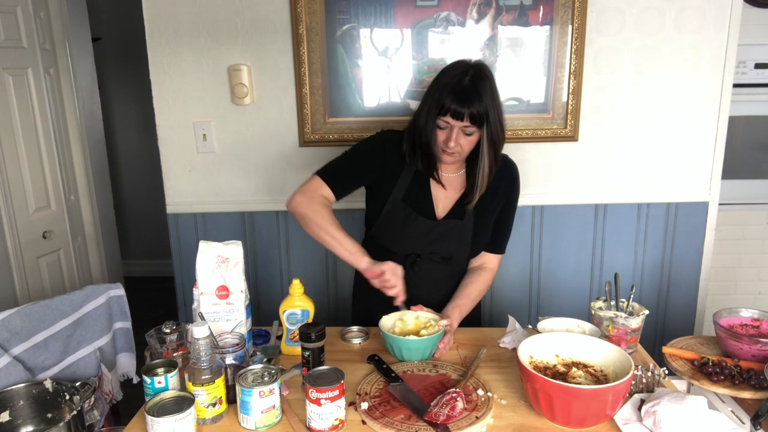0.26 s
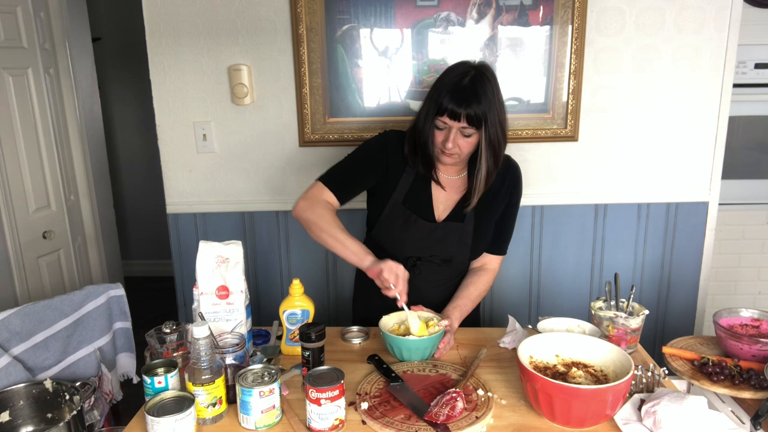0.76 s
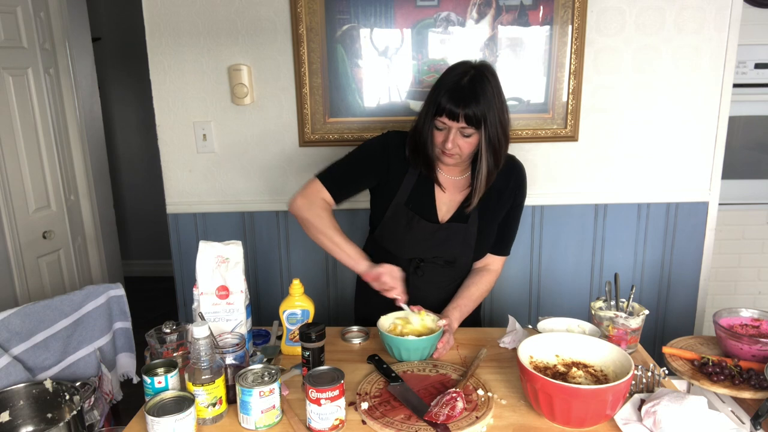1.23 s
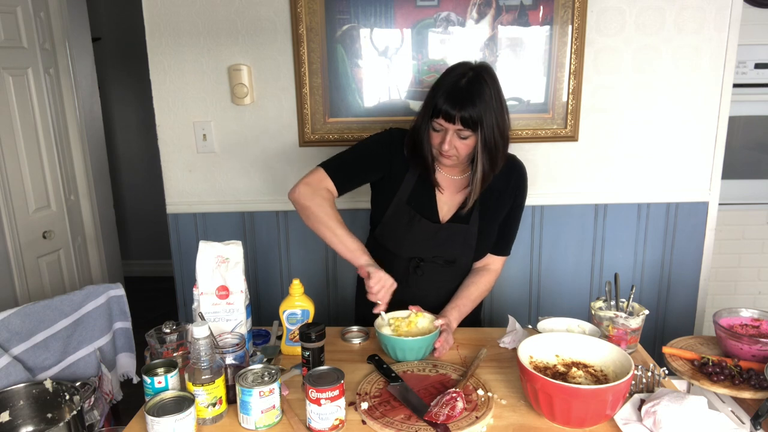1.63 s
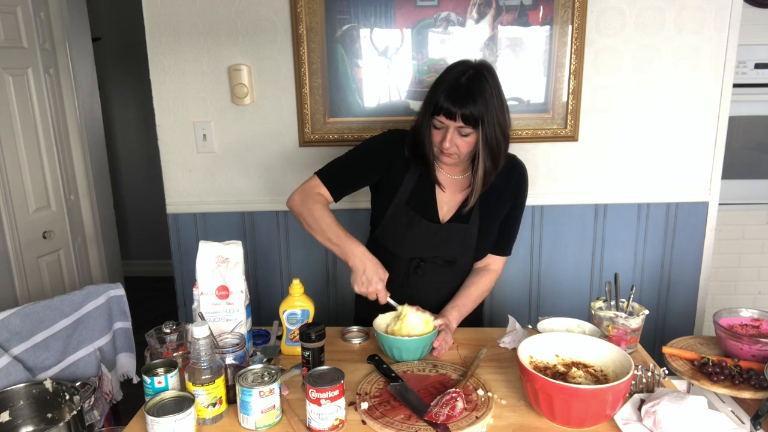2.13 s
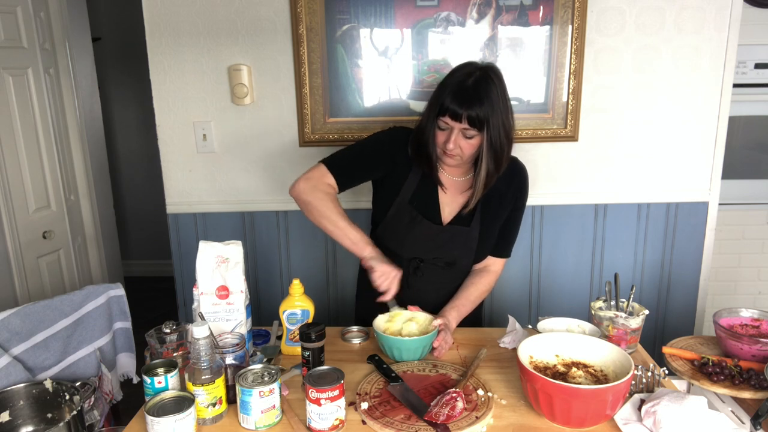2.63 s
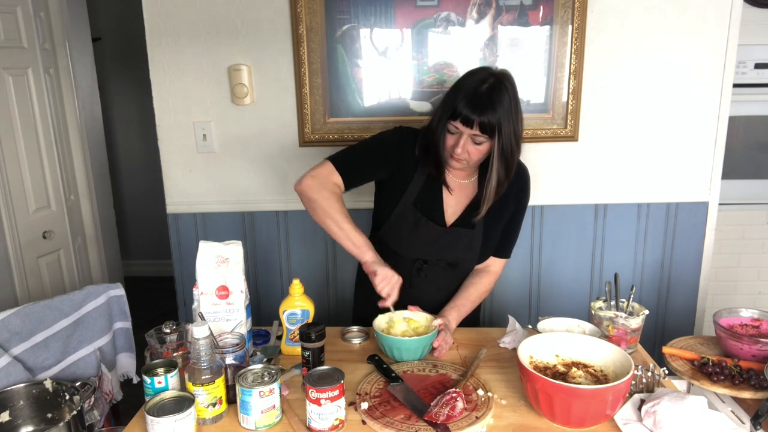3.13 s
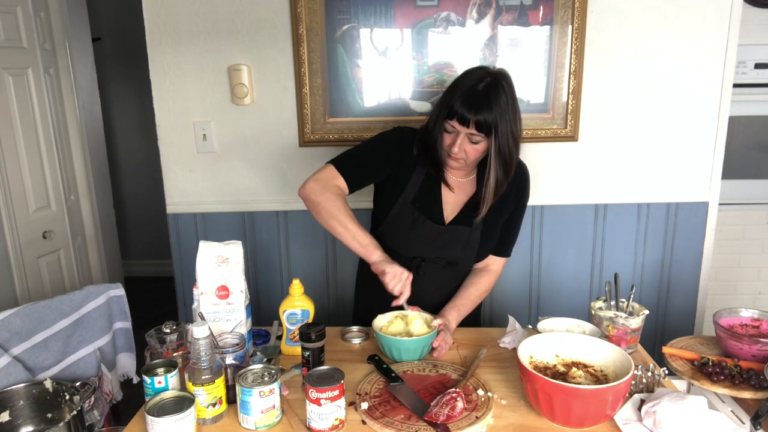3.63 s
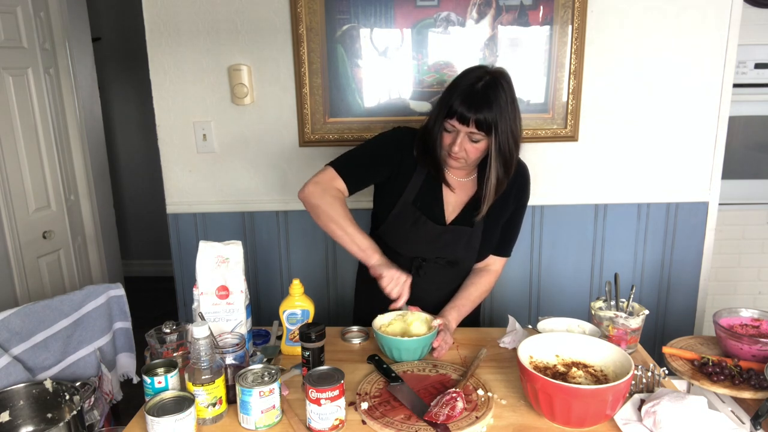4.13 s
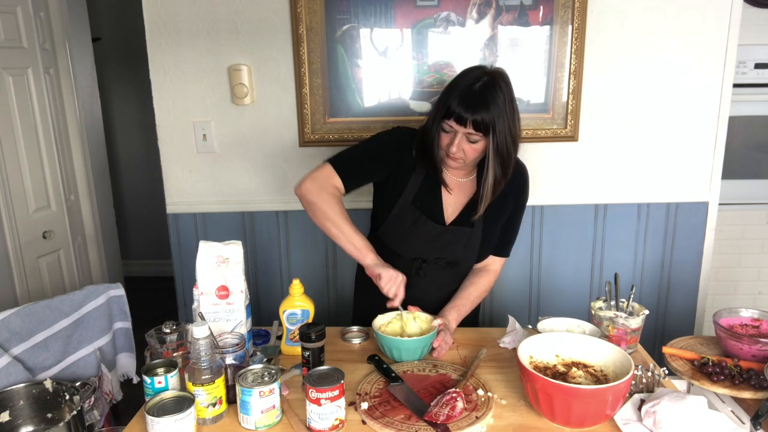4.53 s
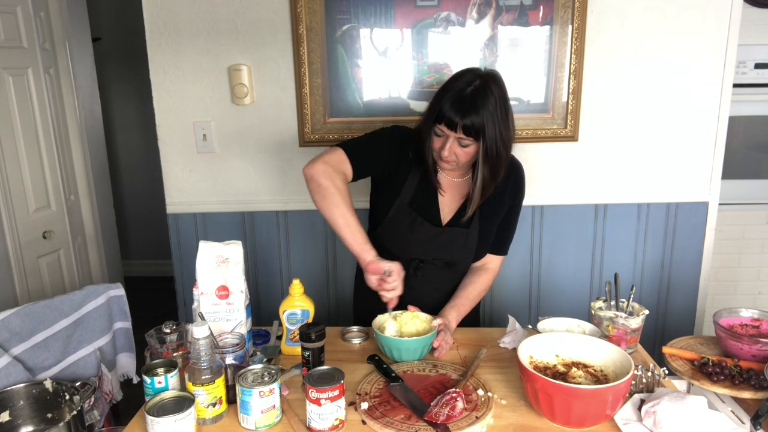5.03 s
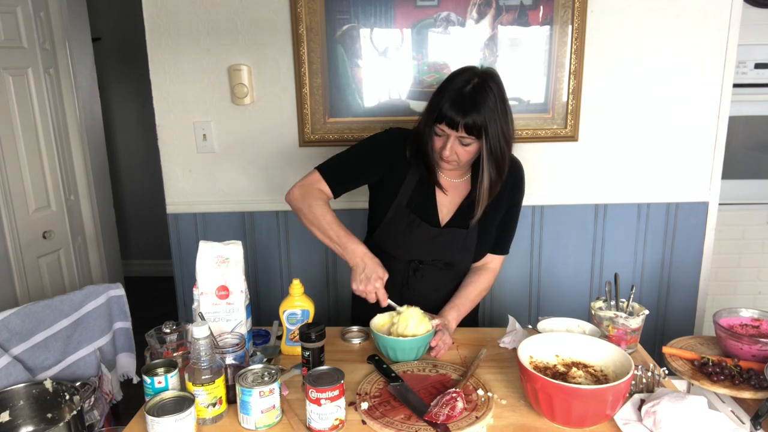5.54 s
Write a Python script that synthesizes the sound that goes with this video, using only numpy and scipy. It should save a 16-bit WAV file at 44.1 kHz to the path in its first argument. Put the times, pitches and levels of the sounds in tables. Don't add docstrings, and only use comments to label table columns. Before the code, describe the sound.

A metal spoon mashes soft, wet food in a small ceramic bowl on a wooden table, heard from a few metres away in a lively kitchen with a short echo and faint steady hiss. A soft bump opens over quiet stirring, with small sticky ticks and smacks. At about 0.9 s the spoon clinks on the bowl; at 1.1 s a harder knock thumps the table, with smaller bumps after. Around 1.7 to 1.9 s come another clink, duller knocks and a short gritty scrape along the wall. From 2 to 4.7 s it is mostly gentle squelching, tiny pops and wet smacks, a little stronger near 4.1 s, with faint table thuds. At 4.8 s the loudest, brightest knock rings briefly on the rim. A longer hollow scrape runs from 5.0 to 5.4 s, ending in a sharp tap and light bumps, then quiet stirring until nearly 6 s.

```python
import sys
import numpy as np
from scipy import signal
from scipy.fft import rfft, irfft
from scipy.io import wavfile

SR = 44100
rng = np.random.default_rng(int(sys.argv[2]) if len(sys.argv) > 2 else 0)


def master(y):
    cut = np.clip(np.atleast_2d(y).T, -1, 1)
    pcm = np.round(cut * 32767)
    wavfile.write(sys.argv[1], SR, pcm.astype(np.int16))


def voltage_ratio(level):
    return 10 ** (np.asarray(level, float) / 20)


N = 255162


def evened(x):
    return x / np.sqrt(np.mean(x ** 2) + 1e-20)


def read(points, hz):
    f, value = np.transpose(points)
    return np.interp(np.log(hz + 1), np.log(f + 1), value)


def add(mix, s, sound):
    part = mix[round(s * SR):][:len(sound)]
    part += sound[:len(part)]


def hump(centre_hz, octaves):
    return lambda hz: np.exp(-.5 * (np.log2((hz + 1) / centre_hz) / octaves) ** 2)


def coloured(x, gain):
    return evened(irfft(rfft(x) * gain(np.fft.rfftfreq(N, 1 / SR)), N))


def ring(modes, contact_s, travel_s=0., length_s=.08):
    struck = 0
    time = np.arange(round(length_s * SR)) / SR
    for k, (hz, width, db) in enumerate(modes):
        t = np.maximum(time - travel_s * np.sqrt(1000 / hz), 0)
        fade = np.exp(-np.pi * width * t)
        onset = 1 - np.exp(-t / contact_s)
        struck = struck + (-1) ** k * voltage_ratio(db) * width * fade * np.sin(2 * np.pi * hz * t) * onset
    return struck / abs(struck).max()


def slips(per_s, spread_db):
    size = voltage_ratio(spread_db * np.minimum(rng.exponential(1, N), 4)) * rng.choice([-1., 1.], N)
    return size * (rng.random(N) < per_s / SR)


def clumps(per_s, depth_db):
    knots = rng.standard_normal(200)
    return voltage_ratio(depth_db * np.interp(np.arange(N) / SR * per_s, np.arange(len(knots)), knots))


# t/s, peak level/dB, tilt/dB per octave.
BOTTOM_MODES = [(420, 135, 0), (780, 300, -7), (1180, 404, -3.5), (1710, 260, 1), (2050, 418, -3.5),
                (3100, 602, -26), (3870, 802, -7), (5000, 800, -9.5), (6000, 800, -12), (9800, 2800, -17)]
BOTTOM_KNOCKS = [(0.8677, -23, -0.014), (0.871, -31.5, -0.67)]
FLAT_MODES = [(814, 580, -7), (1120, 450, 0.5), (1680, 180, -2), (2310, 580, -13), (3180, 880, 1.5),
              (3950, 630, -10), (4690, 470, -2.5), (5500, 900, -4.5), (7000, 2200, 2), (11000, 5300, -4),
              (14500, 5200, -34)]
FLAT_KNOCKS = [(0.0106, -42.5, -1.5), (1.1345, -42, 0), (1.1359, -17.5, 0), (1.1374, -29, 0.5),
               (1.1391, -32.5, -1)]
WALL_MODES = [(806, 81, 2), (1655, 88, 4.5), (2320, 710, -9), (3140, 570, -4.5), (3850, 900, -9),
              (4800, 410, -9), (6520, 1400, -10), (7800, 2900, -6.5), (11000, 2000, -13.5)]
WALL_KNOCKS = [(1.7, -25, -0.1)]
HEEL_MODES = [(906, 400, -5), (1090, 37, -3.5), (1300, 140, -1), (2800, 2100, -4), (5430, 800, -12),
              (9000, 2200, -10)]
HEEL_KNOCKS = [(1.841, -31, -1)]
DULL_KNOCKS = [(1.681, -44, -4), (1.695, -46, -8), (1.885, -30.5, -4.5), (1.9112, -36.5, -6),
               (5.048, -49, -4), (5.064, -42, -8), (5.183, -37, -6), (5.241, -44, -2)]
CURVE_MODES = [(893, 210, 4.5), (1375, 350, 1.5), (2820, 660, -4), (3460, 160, -2.5), (4370, 990, 1.5),
               (6740, 1400, -6.5), (7650, 790, -10), (11600, 4100, -23)]
CURVE_KNOCKS = [(5.3602, -33, -2.5), (5.3704, -32, 2.5), (5.372, -24, 1.4)]
RIM_MODES = [(956, 150, -1.5), (2250, 750, 4), (1500, 340, -21), (2490, 380, 4), (3300, 650, 2),
             (4010, 580, 1.5), (4400, 400, 6), (5220, 1000, 0), (6500, 560, 6.5), (9190, 550, -3.5),
             (10170, 1500, -6.5), (13500, 2200, -13)]
RIM_KNOCKS = [(4.8, -15, -0.043), (4.8016, -22.5, -0.5), (4.8039, -30, -0.5)]


def knocks():
    out = np.zeros(N)
    spots = [
        (BOTTOM_MODES, BOTTOM_KNOCKS),
        (FLAT_MODES, FLAT_KNOCKS),
        (WALL_MODES, WALL_KNOCKS),
        (HEEL_MODES, HEEL_KNOCKS + DULL_KNOCKS),
        (CURVE_MODES, CURVE_KNOCKS),
        (RIM_MODES, RIM_KNOCKS),
    ]
    for modes, hits in spots:
        for s, db, tilt_db in hits:
            tilted = [(hz, width, d + tilt_db * np.log2(hz / 1000)) for hz, width, d in modes]
            add(out, s, voltage_ratio(db - 2.0) * ring(tilted, contact_s=0.00063, travel_s=0.0012))
    return signal.sosfilt(signal.butter(2, 350, "high", fs=SR, output="sos"), out)


# f/Hz, width/Hz, level/dB
TABLE_MODES = [(164.3, 15, -4.5), (259, 59, 0.5), (313, 38, 2.5), (360.4, 57, -4), (420, 31, 2),
               (492, 264, -0.5), (618, 260, -6.5)]
# t/s, peak level/dB, boom level of the legs/dB, pitch f/Hz
THUMPS = [(0.013, -48, -46, 252), (0.219, -59, -51, 264), (0.549, -73, -78, 312), (0.869, -47, -72, 330),
          (1.137, -30.5, -66, 325), (1.199, -37.5, -48, 224), (1.247, -54, -61, 428),
          (1.468, -63, -55, 161), (1.579, -57, -75, 299), (1.699, -35, -47, 320), (1.779, -43.5, -82, 423),
          (1.843, -40.5, -74, 446), (1.908, -45.5, -90, 477), (2.36, -58, -81, 463), (2.394, -49, -87, 245),
          (2.745, -58, -59, 303), (2.859, -57, -68, 260), (3.487, -54.5, -82, 265),
          (3.587, -54.5, -76, 260), (3.645, -62, -72, 264), (4.264, -60, -75, 430), (4.804, -36, -70, 313),
          (5.042, -46, -80, 250), (5.373, -44, -78, 433), (5.413, -40, -73, 457), (5.469, -49, -73, 252)]


def thumps():
    out = np.zeros(N)
    t = np.arange(round(.2 * SR)) / SR
    swell = t / 0.054 * np.exp(1 - t / 0.018)
    for s, db, boom_db, centre_hz in THUMPS:
        near = [(hz, width, d - 7.6 * abs(np.log2(hz / centre_hz))) for hz, width, d in TABLE_MODES]
        add(out, s, voltage_ratio(db - 2) * ring(near, contact_s=0.0021))
        boom_hz = rng.uniform(66.6, 91.6)
        add(out, s, voltage_ratio(boom_db - 7.0) * np.sin(2 * np.pi * boom_hz * t) * swell)
    return out


def resonate(x, hz, width):
    turn = np.exp(2j * np.pi * np.cumsum(hz) / SR)
    r = np.exp(-np.pi * width / SR)
    return 2 * (turn * signal.lfilter([1 - r], [1, -r], x / turn)).real


def dragged(grit, modes):
    total = 0
    for k, (hz, width, db) in enumerate(modes):
        patchy = grit * clumps(30, 1.7)
        wandering_hz = hz * clumps(14, 0.27)
        total = total + (-1) ** k * voltage_ratio(db) * resonate(patchy, wandering_hz, width)
    return evened(total)


# t/s, pressure level/dB, speed as brightness level/dB, hollow tone f/Hz
SCRAPES = [
    [(1.662, -54, -11, 835), (1.69, -51, -32, 835), (1.702, -43.5, -3, 820), (1.72, -47.5, -18, 814),
     (1.826, -46.5, -15, 940), (1.87, -56, -4.5, 1090), (1.915, -50.5, -5.5, 1090),
     (1.95, -60.5, -11, 1090), (2.0, -77, -6, 1090)],
    [(5.03, -62, -28, 919), (5.055, -43, -14, 930), (5.075, -48, -4.5, 1010), (5.145, -46.5, -1.5, 1320),
     (5.185, -49.5, -0.5, 1170), (5.215, -57.5, 1.5, 1170), (5.25, -51, -3, 1100), (5.3, -57, -1, 1010),
     (5.37, -57, 5.5, 960)],
    [(5.355, -50, -8, 915), (5.376, -51, -6, 910), (5.4, -65, -2, 920), (5.46, -55, -2, 1240)],
]
# f/Hz, width/Hz, level/dB
DRAG_MIDDLE = [
    [(2200, 600, -4), (3000, 280, 5), (3800, 950, 0), (4850, 470, 0.5)],
    [(2020, 790, -5), (2830, 620, -4), (3640, 780, -5.5), (4510, 500, -0.5)],
]
# f/Hz, width/Hz, level/dB
DRAG_HIGH = [(5940, 470, 7.5), (6450, 460, 7), (7460, 700, 0.5), (9500, 2400, -2.5), (11240, 2800, -11.5)]


def scrapes():
    t = np.arange(N) / SR
    out = np.zeros(N)
    grit = slips(per_s=3200, spread_db=3.2) * clumps(34, 1.5)
    high, top = dragged(grit, DRAG_HIGH[:3]), dragged(grit, DRAG_HIGH[3:])
    for rows, modes in zip(SCRAPES, DRAG_MIDDLE + DRAG_MIDDLE[1:]):
        s, *controls = np.transpose(rows)
        pressure_db, speed_db, hollow_hz = (np.interp(t, s, v) for v in controls)
        hollow = evened(resonate(resonate(grit, hollow_hz, 540), hollow_hz, 540))
        middle = voltage_ratio(4.5 + 0.58 * speed_db) * dragged(grit, modes)
        bright = voltage_ratio(speed_db) * high + voltage_ratio(1.3 * speed_db - 9.5) * top
        fade = np.interp(t, [s[0], s[0] + 0.01, s[-1] - .04, s[-1]], [0, 1, 1, 0])
        out += voltage_ratio(pressure_db - 8.5) * fade * (hollow + middle + bright)
    return out


def tears(rows, snap_s, crackle_level, crackle_s):
    out, size = np.zeros(N), 2048
    t, hz = np.arange(size) / SR, np.fft.rfftfreq(size, 1 / SR)
    fade = np.exp(-t / snap_s) + crackle_level * np.exp(-t / crackle_s)
    envelope = fade * np.minimum(t / 0.00031, 1)
    for s, db, centre_hz, octaves in rows:
        noise = rng.standard_normal(size)
        band = hump(centre_hz, np.clip(octaves, .2, 2))(hz)
        burst = irfft(rfft(noise) * band, size) * envelope
        add(out, s, voltage_ratio(db) * burst / abs(burst).max())
    return out


SMACKS = [(0.2044, -49.5, 4330, 0.4), (0.3142, -47.5, 1550, 0.9), (0.4694, -53.5, 3760, 0.79),
          (0.5157, -55, 2230, 0.38), (0.7961, -50.5, 5500, 0.62), (1.4556, -47.5, 4240, 0.43),
          (1.5509, -59, 3440, 0.22), (2.3521, -46.5, 2900, 1.8), (2.3995, -55.5, 1560, 0.18),
          (2.583, -56, 3560, 0.62), (2.6866, -51, 4700, 0.57), (2.8, -57, 2840, 0.94),
          (2.8294, -59, 3260, 0.4), (2.8574, -46.5, 1500, 0.55), (2.9846, -49, 2500, 0.81),
          (3.0091, -51, 3580, 0.51), (3.02, -50.5, 1350, 0.34), (3.1482, -58, 3470, 0.55),
          (3.267, -55, 5700, 0.16), (3.3004, -48.5, 1520, 1.03), (3.8995, -47.5, 1950, 0.52),
          (3.9524, -53, 3600, 0.28), (4.0542, -48, 4400, 0.84), (4.0981, -42, 4240, 0.62),
          (4.14, -48, 2260, 0.55), (4.359, -58, 3660, 0.75), (4.4737, -57, 4800, 0.25),
          (4.5226, -62, 2660, 0.49), (4.6543, -56, 3500, 0.25), (5.6246, -62, 2590, 1.1)]
TICKS = [(0.2077, -51.5, 7190, 0.41), (0.3147, -45, 5500, 0.39), (0.6, -49.5, 8000, 0.36),
         (0.979, -55, 6300, 0.57), (1.4537, -49.5, 7000, 0.7), (1.5759, -46, 5000, 0.53),
         (2.0373, -53, 8550, 0.28), (2.8737, -51, 5270, 0.67), (3.276, -56, 5670, 0.35),
         (3.7826, -54.5, 5960, 0.76), (3.8198, -52.5, 5740, 0.48), (3.4497, -51.5, 4900, 0.32),
         (4.3326, -62, 7660, 0.71), (4.5226, -52, 6060, 0.84), (2.4678, -55, 5500, 0.41),
         (5.756, -59, 3500, 0.5)]
FINE_TICKS = [(2.2538, -66, 13500, 0.6), (2.3477, -54, 10600, 1), (2.6249, -56, 9740, 0.79),
              (2.714, -55, 12100, 0.55), (2.9444, -59, 12500, 0.54), (3.0587, -50, 12000, 0.81),
              (3.23, -52, 7500, 0.76), (0.921, -56, 12000, 0.5), (1.237, -54, 11500, 0.5),
              (1.347, -58, 11500, 0.6), (1.333, -62, 13500, 0.3), (4.552, -58, 9500, 0.4),
              (4.603, -65, 7500, 0.45), (3.276, -57, 10500, 0.6), (3.4497, -56, 13100, 0.66),
              (3.8295, -54, 11300, 0.44), (3.8846, -55, 9080, 0.41), (4.083, -49, 9300, 0.75),
              (5.3725, -47, 11000, 0.74), (5.525, -59, 12000, 0.4), (5.546, -53, 11000, 0.22)]
SMEARS = [(0.193, -59, 4500, 0.36), (0.2838, -56, 5000, .8), (0.2845, -61, 13500, .3),
          (0.49, -61, 13500, .3), (0.566, -57, 11500, .4), (0.713, -66, 8500, .3), (0.33, -54, 6000, .4),
          (2.215, -65, 5000, .4), (2.257, -67, 7500, .3), (2.5362, -58.5, 2400, .4),
          (2.6584, -57, 5500, 0.24), (2.8121, -56.5, 3000, .3), (2.825, -54, 3800, .6),
          (2.843, -51, 4000, 0.77), (2.866, -52, 3800, .4), (2.885, -61, 4000, .5), (3.023, -54, 3800, .5),
          (3.06, -62, 5500, .4), (3.4053, -55, 3500, .5), (3.44, -59, 5200, .3), (3.5589, -57, 6000, 0.28),
          (3.905, -56, 3800, 0.25), (4.066, -58, 7000, .5), (4.075, -54, 9000, .4), (4.4125, -56, 2300, .3),
          (4.4594, -56, 2500, .5), (4.553, -55.5, 2200, 0.42), (4.6045, -61, 1500, .5),
          (4.662, -57, 3800, .3)]


def mash():
    smacks = tears(SMACKS, snap_s=0.00045, crackle_level=0.29, crackle_s=0.01)
    ticks = tears(TICKS + FINE_TICKS, snap_s=0.00047, crackle_level=0.13, crackle_s=0.0085)
    smears = tears(SMEARS, snap_s=0.0008, crackle_level=0.33, crackle_s=0.0077)
    return smacks + ticks + smears


def bubbles(low_hz, high_hz, per_s, spread_db, patchy_db):
    total = 0
    for hz in np.geomspace(low_hz, high_hz, 4):
        pops = slips(per_s, spread_db) * clumps(26, patchy_db)
        total = total + coloured(pops, hump(hz, 0.42))
    return evened(total)


# t/s, effort level/dB
STIR = [(0.0, -58.5), (0.08, -72), (0.55, -69), (0.9, -57), (1.02, -70), (1.22, -55.5), (1.42, -77),
        (1.62, -59.5), (1.9, -57), (2.1, -71.5), (2.75, -70.5), (3.5, -65.5), (4.1, -69), (4.62, -72.5),
        (4.85, -60), (5.33, -68.5), (5.5, -76), (5.79, -66.5)]
# start t/s, length/s, depth level/dB
PAUSES = [(0.63, 0.16, -26), (0.815, 0.022, -3), (1.067, 0.052, -22), (2.936, 0.068, -8),
          (3.087, 0.069, -15), (4.71, 0.055, -23), (4.97, 0.033, -17), (5.56, 0.14, -2.5)]
# t/s, table tremble level/dB, leg sway level/dB
LEANS = [(.04, -58.5, -52), (.45, -103, -69), (.92, -70, -88), (1.219, -58, -57.5), (1.5, -89, -70),
         (1.57, -74, -87), (1.75, -53.5, -75), (1.88, -71, -96), (2.03, -89, -77), (2.45, -70, -65.5),
         (3.9, -85, -71.5), (4.09, -78, -89), (4.2, -98, -71), (4.38, -106, -80), (4.84, -77, -68),
         (4.93, -90, -89), (5.1, -87, -67), (5.31, -72, -96), (5.45, -58.5, -65.5), (5.78, -73, -75)]


def stirring():
    t = np.arange(N) / SR
    effort_db = np.interp(t, *np.transpose(STIR))
    for s, length, depth_db in PAUSES:
        inside = np.minimum(t - s, s + length - t)
        effort_db = effort_db + depth_db * np.clip(inside / 0.03 + 1, 0, 1)
    fizz_db = -66.5 + 0.38 * (effort_db + 65.5)
    tremble, sway = voltage_ratio(effort_db - 11.5), voltage_ratio(effort_db - 20)
    for s, tremble_db, sway_db in LEANS:
        lean = np.exp(-abs(t - s) / 0.04)
        tremble = tremble + voltage_ratio(tremble_db) * lean
        sway = sway + voltage_ratio(sway_db) * lean
    rumble = evened(signal.oaconvolve(slips(150, 4.7), ring(TABLE_MODES, contact_s=0.0014))[:N])
    squelch = bubbles(800, 3300, per_s=400, spread_db=4.5, patchy_db=3.5)
    fizz = bubbles(4450, 7870, per_s=390, spread_db=2.8, patchy_db=4.4)
    boom = coloured(rng.standard_normal(N), hump(65.4, 0.5))
    wet = voltage_ratio(effort_db - 7) * squelch + voltage_ratio(fizz_db - 10.5) * fizz
    return tremble * rumble + wet + sway * boom


# delay t/s, level/dB
ECHOES = [(.0021, -14), (.0036, -8), (.008, -14.5), (.0155, -15.5), (.021, -17)]
# f/Hz, t/s
FADE_TIMES = [(80, 0.37), (300, 0.22), (1000, 0.36), (3000, 0.37), (7000, 0.33), (14000, 0.16)]
# f/Hz, level/dB
ROOM_LEVELS = [(80, 0), (400, 3), (1500, 2.5), (5000, -0.5), (14000, -0.5)]


def kitchen(x):
    out, t = x.copy(), np.arange(N) / SR
    dull = signal.sosfilt(signal.butter(2, 6640, fs=SR, output="sos"), x)
    for k, (delay, db) in enumerate(ECHOES):
        add(out, delay, (-1) ** k * voltage_ratio(db) * dull)
    for k in range(3):
        taps = np.zeros(SR // 2)
        at = np.arange(200, SR // 2 - 12, 12)
        taps[at + rng.integers(0, 12, len(at))] = rng.choice([-1., 1.], len(at))
        taps *= 1 - np.exp(-np.arange(len(taps)) / SR / 0.0036)
        hz, s, z = signal.stft(taps, SR, nperseg=256)
        decay = voltage_ratio(-60 * s / read(FADE_TIMES, hz)[:, None])
        decay = decay / np.linalg.norm(decay, axis=1)[:, None]
        decay = decay * voltage_ratio(read(ROOM_LEVELS, hz))[:, None]
        tail = signal.istft(z * decay, SR, nperseg=256)[1] * np.sqrt(12 / 128)
        turn = np.sqrt(2 / 3) * np.cos(np.pi * (t / .7 + k / 3))
        out += signal.oaconvolve(x * turn, tail)[:N]
    return out


# f/Hz, level/dB per Hz
HISS = [(15, -36), (25, -5), (165, -4), (620, -6.5), (857, -12), (1180, -15), (1900, -17), (15800, -29)]


def hiss():
    noise = rng.standard_normal(N)
    return voltage_ratio(-71) * coloured(noise, lambda hz: voltage_ratio(read(HISS, hz)) * (hz < 15880))


def scene():
    wet = mash()
    room_share = .7
    bowl = knocks() + thumps() + scrapes() + stirring() + room_share * wet
    mono = kitchen(bowl) + (1 - room_share) * wet + hiss()
    return np.array([mono, mono])


def band_limit(x):
    return signal.sosfilt(signal.butter(12, 16760, fs=SR, output="sos"), x)


# f/Hz, level/dB
TREBLE_COLOUR = [(7900, 0.53), (8500, -1.5), (16000, 4)]


def record(dry):
    heard = irfft(rfft(dry) * voltage_ratio(read(TREBLE_COLOUR, np.fft.rfftfreq(N, 1 / SR))), N)
    heard = signal.sosfilt(signal.butter(4, 60, "high", fs=SR, output="sos"), heard)
    limit = .13
    rounded = limit * np.tanh(heard / limit)
    finished = signal.sosfilt(signal.butter(30, 15900, fs=SR, output="sos"), rounded)
    return band_limit(finished)


dry = scene()
out = record(dry)
master(out)
```